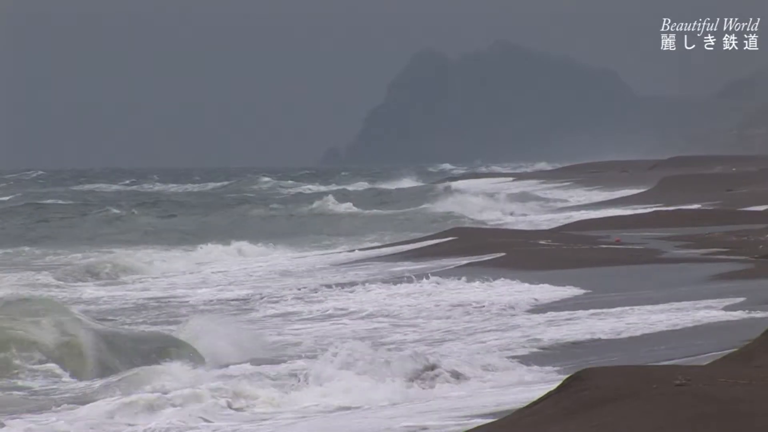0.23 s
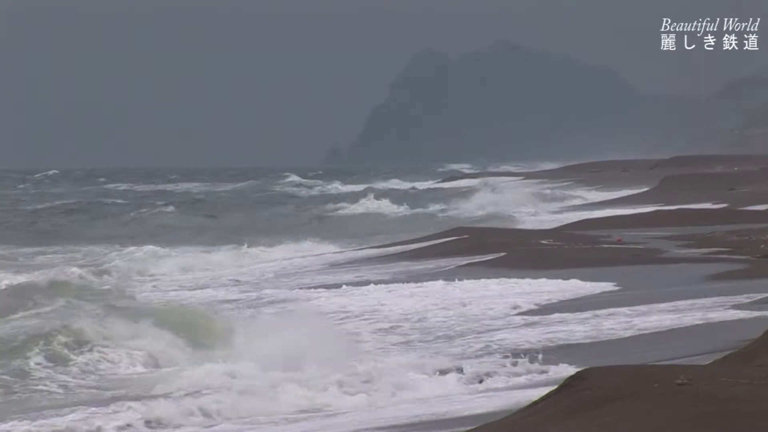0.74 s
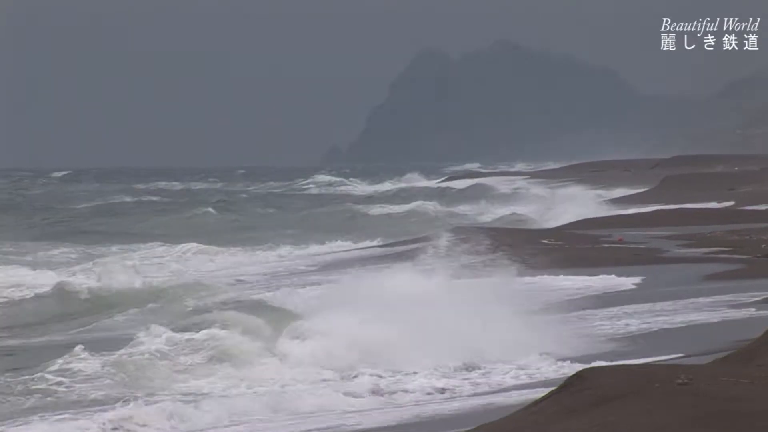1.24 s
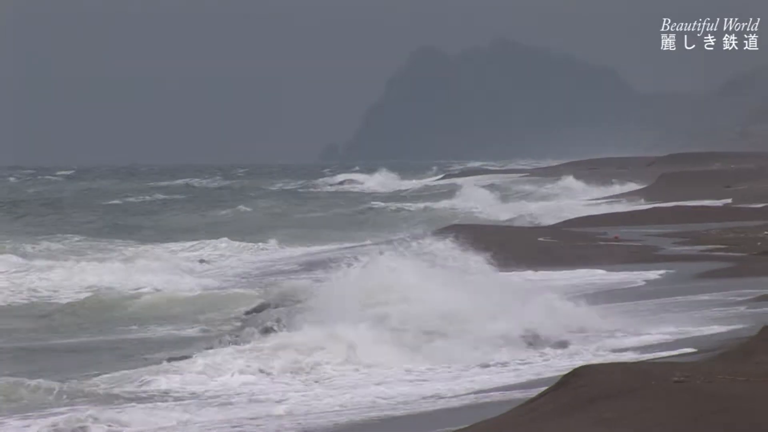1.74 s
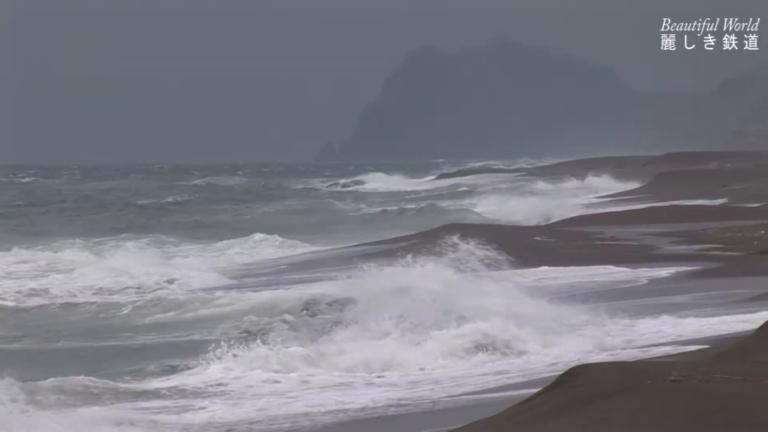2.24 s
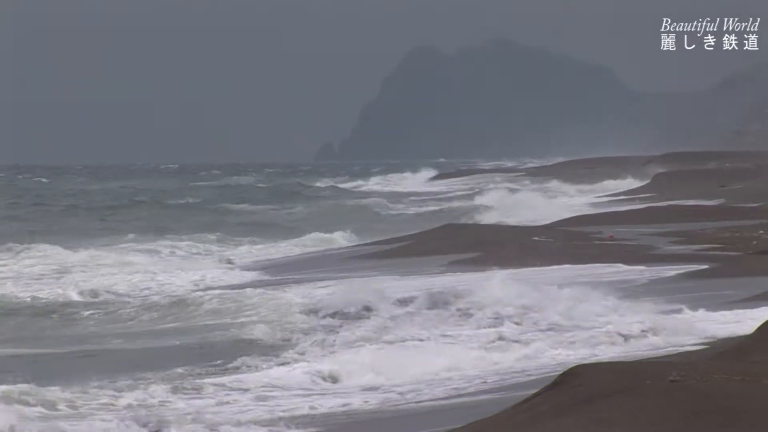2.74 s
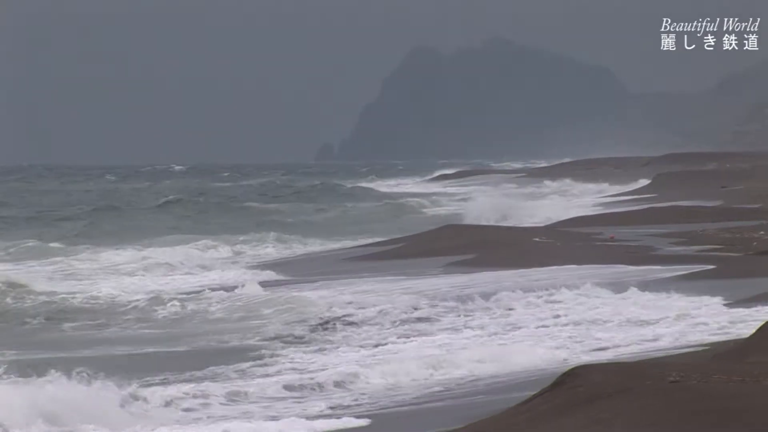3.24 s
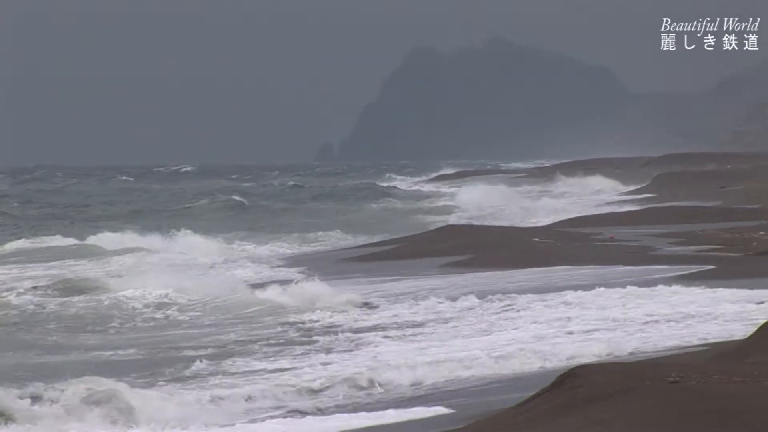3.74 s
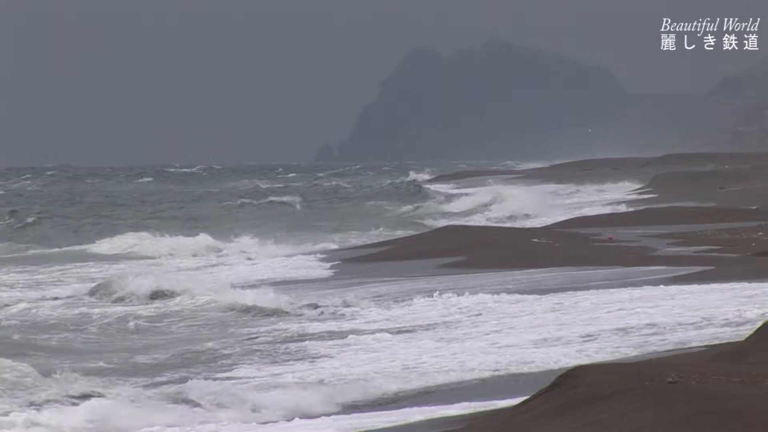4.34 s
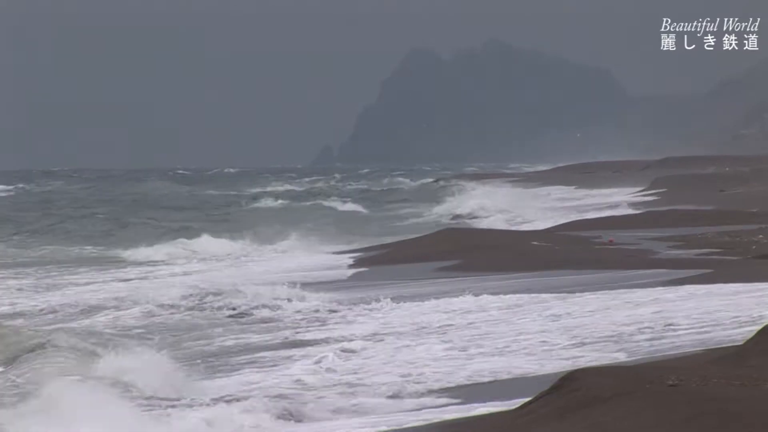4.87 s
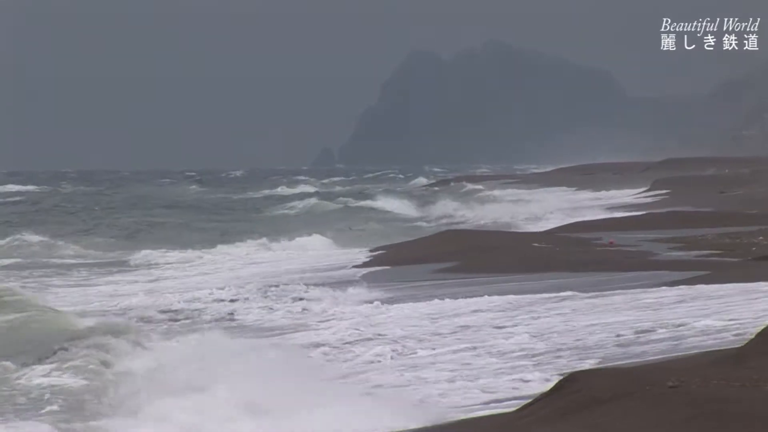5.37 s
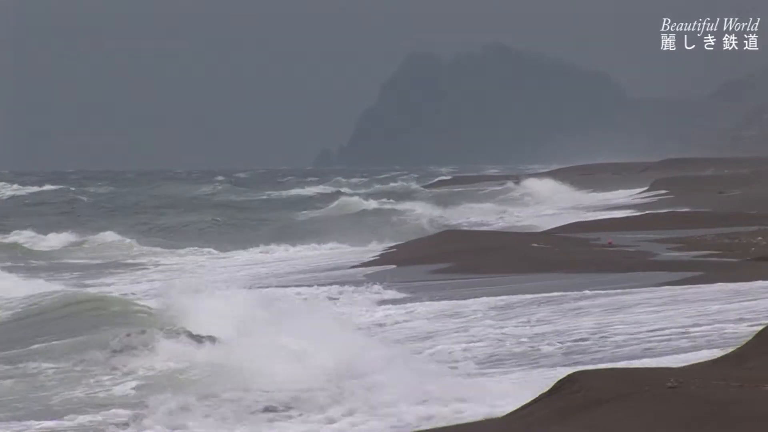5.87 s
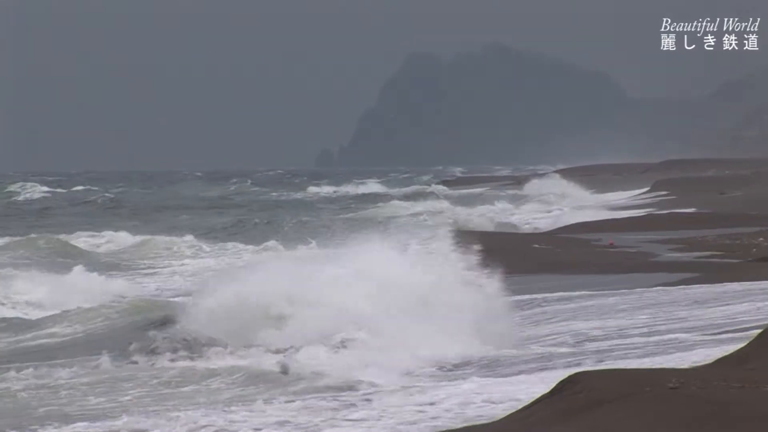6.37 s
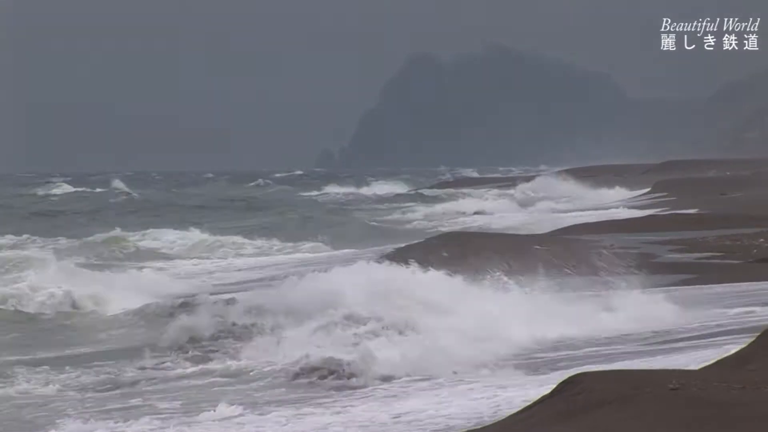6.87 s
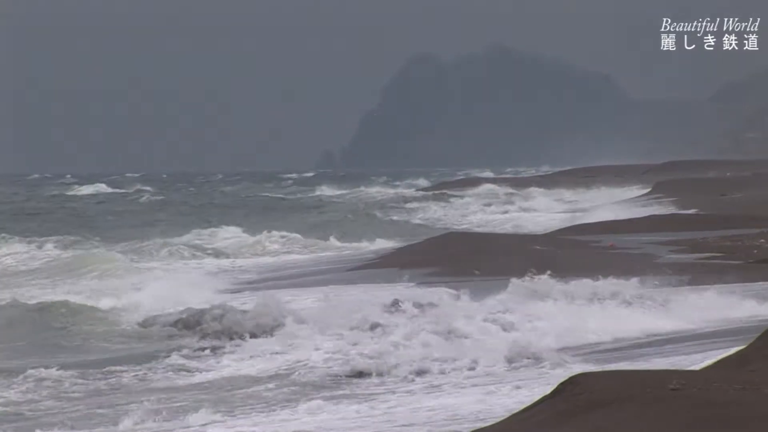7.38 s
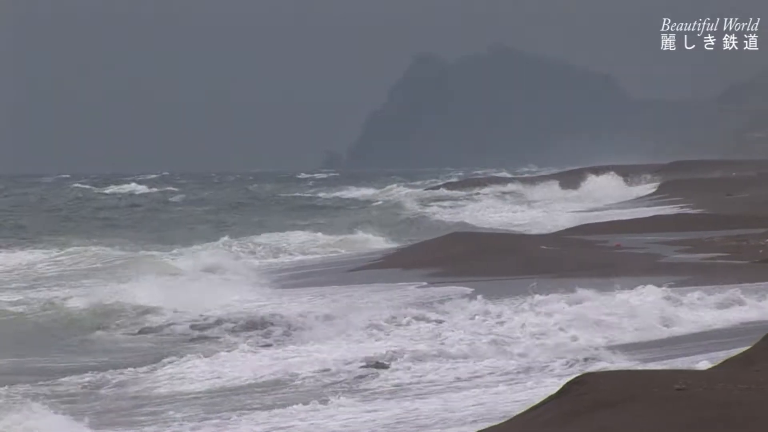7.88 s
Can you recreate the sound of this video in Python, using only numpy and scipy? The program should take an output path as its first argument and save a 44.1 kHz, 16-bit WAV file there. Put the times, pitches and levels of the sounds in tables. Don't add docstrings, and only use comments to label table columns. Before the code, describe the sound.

Wind rumble dominates at first, fluttering and knocking on two unshielded microphone ports, with rough sea roaring behind it. After three seconds the gusts break into separate short thumps and the surf sinks, then a new breaker builds from five seconds to a full roar with hissing foam and fizzing spray, easing at the end. Open beach, no echo.

```python
import sys
import numpy as np
from scipy import signal
from scipy.fft import rfft, irfft, next_fast_len
from scipy.io import wavfile
from scipy.ndimage import uniform_filter1d

SR = 44100
rng = np.random.default_rng(int(sys.argv[2]) if len(sys.argv) > 2 else 0)


def natural_amplitude(level_db):
    exponent = np.asarray(level_db, float) / 20
    return 10 ** exponent


def log_audio(samples):
    frames = np.atleast_2d(samples).T
    limited = np.clip(frames, -1, 1)
    pcm = np.round(limited * 32767).astype(np.int16)
    wavfile.write(sys.argv[1], SR, pcm)


N = 357642


def rms_one(x):
    return x / np.sqrt(np.mean(x ** 2) + 1e-20)


def in_time(rows):
    s, *columns = np.transpose(rows)
    return [np.interp(np.arange(N) / SR, s, c) for c in columns]


def at_hz(points, hz):
    points = np.array(points)
    return np.interp(np.log(hz + 1), np.log(points[:, 0] + 1), points[:, 1])


def swelling(start_s, length_s, rise_s, fall_s):
    end_s = start_s + length_s
    corners_s = [start_s - rise_s, start_s, end_s, end_s + fall_s]
    first = max(int(corners_s[0] * SR), 0)
    last = min(int(corners_s[-1] * SR), N)
    shape = np.zeros(N)
    shape[first:last] = np.interp(np.arange(first, last) / SR, corners_s, [0, 1, 1, 0])
    return shape


def drift(rate_hz):
    pole = np.exp(-80 * np.pi * rate_hz / SR)
    noise = rng.standard_normal(N // 40 + 2002)
    slow = signal.lfilter([1], [1, -2 * pole, pole * pole], noise)[2000:]
    return np.interp(np.arange(N) / 40, np.arange(len(slow)), rms_one(slow))


def steady(x, span_s):
    power = uniform_filter1d(np.mean(x ** 2, axis=0), max(int(span_s * SR), 1))
    return x * np.sqrt(power.mean() / (np.abs(power) + 1e-12))


def butter(x, order, hz, kind):
    return signal.sosfilt(signal.butter(order, hz, kind, fs=SR, output="sos"), x)


# freq_hz, share_0to1
LIKENESS = [(60, 0.88), (300, 0.96), (900, 0.83), (1900, 0.98), (2450, 0.49), (3000, 1), (4200, 0.63),
            (4650, 1), (5000, 1), (7200, 0.61), (9100, 0.89), (10400, 1), (12800, 0.3), (14000, .6)]
# freq_hz, lead_rad
LEFT_LEAD = [(0, 0), (250, .75), (600, 1.15), (1300, -.15), (2800, -.3), (3500, .3), (4400, 2.1),
             (4900, 1.2), (5500, 3.0), (9100, 3.3), (9600, 5.1), (12300, 6.4), (12900, 4.7), (15000, 7.4)]


def ports(sound, left, right):
    size = next_fast_len(N)
    hz = np.arange(size // 2 + 1) * SR / size
    common, own_left, own_right = rfft(sound, size)
    alike = np.clip(at_hz(LIKENESS, hz), 0, 1)
    shared, apart = np.sqrt(alike) * common, np.sqrt(1 - alike)
    lag = np.exp(-1j * np.interp(hz, *np.transpose(LEFT_LEAD)))
    at_left = (shared + apart * own_left) * natural_amplitude(at_hz(left, hz))
    at_right = (shared * lag + apart * own_right) * natural_amplitude(at_hz(right, hz))
    return rms_one(irfft([at_left, at_right], size)[:, :N])


# start_s, buffet_db, deep_rel_db, left_minus_right_db
BREEZE = [
    (0, -44, -6, 1),
    (1.2, -41, -23, 0),
    (2.9, -42, -14, 0),
    (3.1, -50, 4.5, 1.5),
    (4.1, -51, -4, 1.5),
    (5.6, -50, -0.5, 0),
    (6.2, -44, -6, 2.5),
    (7.3, -47, -11, 2),
    (8.11, -49, 3, -3),
]
# start_s, length_s, buffet_db, deep_rel_db, fine_rel_db
GUSTS = [(0.091, .05, -37, -4.5, -4), (0.17, .08, -35, -2, -2), (0.368, .06, -39, 4.5, -10),
         (0.466, .25, -31, -10, -11.5), (0.785, .08, -33, -16.5, -3.5), (0.901, .06, -32.5, -16, -6),
         (1.026, .13, -32, -11, -9), (1.23, .19, -36, -8, -5), (1.445, 0.11, -30.5, -20, -6.5),
         (1.595, .1, -30, -11, -6), (1.767, .14, -28.5, -19, -8), (1.94, .32, -34, -7, -5),
         (2.325, .4, -30.5, -16, -4.5), (2.752, .13, -28.5, -9.5, -8.5), (2.922, .07, -37.5, -5, -3.5),
         (3.25, .05, -35, -4, -4.5), (3.337, .08, -35, -7, -5), (3.849, .07, -38, -2, -4),
         (4.333, .065, -39, -3, -5), (4.522, .085, -31.5, -16.5, -4.5), (5.323, 0.09, -32, -12, -9),
         (5.9, 0.18, -40.5, -10, -4.5), (6.233, 0.07, -40, -2, -8), (7.48, .14, -35.5, -5, -4)]
# centre_s, buffet_db, deep_rel_db, fine_rel_db
PUFFS = [(7.44, -38.5, -4, -4), (1.73, -30.5, -2, 0), (3.215, -39.5, -5, -14), (3.55, -44, 1, -15),
         (3.68, -34.5, -6, -6), (3.76, -42.5, 0, -5), (3.931, -34.5, -7, -5.5), (4.03, -45.5, -12, -3),
         (4.48, -31, -16, -10), (4.66, -37.5, -7, -5), (4.74, -37, -13, -8), (4.89, -41.5, -8.5, -7),
         (4.989, -32.5, -4, -6), (5.1, -41.5, -2, -10.5), (5.16, -41.5, 4, -7), (5.509, -42, -15, 1),
         (6.15, -36, -6, -16), (6.34, -33.5, 0, -8), (6.379, -34, -2, -4), (6.51, -38.5, -12, -4),
         (6.6, -42, -11, -4), (6.71, -41.5, -1.5, -4), (6.84, -42, -9, -4), (6.94, -36.5, -1, -18),
         (7.0, -42, 0, -13), (7.13, -41.5, -10, 6), (7.88, -42, 4.5, -1), (7.97, -32.5, -5, -2),
         (8.055, -33.5, 7, -4), (8.084, -34, 9, 0)]


def airflow():
    puff_s, rise_s, fall_s = 0.02, 0.02, 0.025
    breeze_fine_db, breeze_wander_db, lean_wander_db = -4, 2.5, 2
    breeze_db, breeze_deep_db, lean_db = in_time(BREEZE)
    power = natural_amplitude(2 * (breeze_db + breeze_wander_db * drift(9)))
    deep, fine = power * breeze_deep_db, power * breeze_fine_db
    puffs = [(s - puff_s / 2, puff_s, *rest) for s, *rest in PUFFS]
    for start_s, length_s, buffet_db, deep_db, fine_db in list(GUSTS) + puffs:
        blast = natural_amplitude(2 * buffet_db) * swelling(start_s, length_s, rise_s, fall_s) ** 2
        power = power + blast
        deep = deep + blast * deep_db
        fine = fine + blast * fine_db
    return 10 * np.log10(power), deep / power, fine / power, lean_db + lean_wander_db * drift(7.4)


# freq_hz, level_db_per_hz
EDDY_LEFT = [(25, -7), (45, -1), (100, 1), (170, -0.5), (260, -3.5), (400, -12.5), (900, -14.5),
             (1800, -24.5), (2600, -25), (3400, -28), (5000, -50)]
EDDY_RIGHT = [(25, -22), (45, -4), (100, -1.5), (170, -1.5), (260, -4.5), (400, -10.5), (900, -28),
              (1800, -25), (2600, -26), (3400, -30), (5000, -60)]


def wind(eddies_per_s, denser, top, size_spread_db, flutter_db, fine_flutter_db, level_db):
    deep_below_hz, fine_above_hz = 86, 340
    buffet_db, deep_db, fine_db, pan_db = airflow()
    density_db = denser * (buffet_db - buffet_db.mean())
    born = rng.random((3, N)) < eddies_per_s * natural_amplitude(density_db) / SR
    born = born / natural_amplitude(density_db / 2)
    sizes = natural_amplitude(size_spread_db * np.minimum(rng.exponential(1, (3, N)), 4))
    eddies = born * rng.standard_normal((3, N)) * sizes
    eddies = ports(eddies * natural_amplitude(flutter_db * drift(28)), EDDY_LEFT, EDDY_RIGHT)
    deep, large = [signal.sosfiltfilt(signal.butter(2, hz, fs=SR, output="sos"), eddies)
                   for hz in (deep_below_hz, fine_above_hz)]
    middling = top * np.tanh(steady(large - deep, 0.081) / top)
    fine = (eddies - large) * natural_amplitude(fine_db - fine_db.mean() + fine_flutter_db * drift(30))
    deep = steady(deep, 0.164) * natural_amplitude(deep_db - deep_db.mean())
    lean = natural_amplitude((pan_db - pan_db.mean()) / 2 * np.array([[1], [-1]]))
    return (deep + middling + fine) * lean * natural_amplitude(buffet_db + level_db)


# start_s, vigour_db, brightness_db, break_weight_db
SURF = [(0, -45, 0, 0), (.62, -43.5, -1, -1.5), (1.24, -47.5, 0, -0.5), (1.8, -48, 0, 2.5),
        (2.06, -48, 5, 2), (2.3, -51, 3, 3), (2.38, -50, -2.5, 5.5), (2.85, -51, -3.5, -5.5),
        (3.02, -53, -1, -2), (3.9, -52.5, 0.5, -1.5), (4.4, -52, 0.5, -2.5), (5.0, -47.5, -0.5, -2),
        (5.3, -48.5, 1.5, -2), (5.45, -48.5, 0.5, 0.5), (6.57, -44, 1.5, 0.5), (7.3, -45.5, .5, -0.5),
        (7.75, -46.5, -1, -1), (8.11, -50, 1.5, 0)]
# centre_s, depth_db
LULLS = [(0.20, -5), (0.43, -4), (1.46, 0), (0.8, -2), (1.03, -2), (1.33, -3), (2.05, -2.5), (2.28, -4),
         (3.0, -2), (3.18, -6), (3.32, -3), (4.42, -6), (4.55, -5), (4.9, -2.5), (5.20, -5), (5.26, -4),
         (5.69, -6), (6.19, -4), (6.41, -5), (7.47, -4), (7.51, -7), (7.56, -8), (6.75, -2), (7.02, -3.5),
         (7.88, -7), (8.11, -5)]
# peak_s, over_surf_db
SLAPS = [(0.05, -3), (0.23, -0.5), (0.57, 7), (1.51, 4.5), (2.35, 2), (2.43, 3), (2.69, 5.5), (2.8, 7.5),
         (2.87, 3), (3.09, 1), (3.26, 3), (3.36, 10), (4.37, 2), (4.57, 8.5), (5.33, 3.5), (5.89, 3.5),
         (6.12, 3.5), (6.27, 5), (6.5, 8.5), (7.61, 9.5), (7.81, 1)]
LAYER_FOLLOWS = [0.82, 0.81, 0.94, 1.12]
LAYER_BRIGHTENS = [-.9, -.6, .05, .6]
LAYER_WEIGHS = [1.1, 0.21, .01, .01]


def surf_layers():
    lull_half_s, slap_rise_s, slap_fall_s = 0.039, 0.014, 0.032
    lull_reach = [0.35, 0.56, 0.71, 0.63]
    slap_reach = [0.97, 0.98, 0.16, 0.2]
    vigour_db, bright_db, weight_db = in_time(SURF)
    lulls_db = sum(db * swelling(s, 0, lull_half_s, lull_half_s) for s, db in LULLS)
    slaps_db = sum(db * swelling(s, 0, slap_rise_s, slap_fall_s) for s, db in SLAPS)
    shares = np.transpose([LAYER_FOLLOWS, LAYER_BRIGHTENS, LAYER_WEIGHS, lull_reach, slap_reach])
    return shares @ [vigour_db, bright_db, weight_db, lulls_db, slaps_db]


SURF_LAYER_HZ = [600, 1050, 4200, 11000]
# freq_hz, level_db_per_hz
LEFT_PORT = [(300, 0.5), (600, -1), (1800, 1), (2600, -6.5), (4700, -7), (5200, -11), (5650, -4),
             (6400, -17.5), (7150, -24), (7800, -19.5), (8600, -15.5), (9400, -18), (12700, -12),
             (15000, -20.5)]
RIGHT_PORT = [(300, 2), (900, -4.5), (1800, -6), (2450, -14), (3200, -8), (4650, -21), (5050, -10.5),
              (6400, -22.5), (7150, -37), (7700, -29), (9150, -24), (12600, -31), (14150, -28.5),
              (14400, -50)]


def surf(surge_db, patchy_db, pops_per_s, pop_spread_db, level_db):
    layers_db = surf_layers()
    swell_db = layers_db - layers_db.mean(axis=1, keepdims=True)
    pops = (rng.random((2, 3, N)) < pops_per_s / SR) * rng.standard_normal((2, 3, N))
    bursts = pops * natural_amplitude(pop_spread_db * np.minimum(rng.exponential(1, (2, 3, N)), 4))
    surge = drift(12)
    edges_hz = 30 * 2 ** np.arange(0, 9.6, 0.5)
    water = 0
    for k, (low_hz, high_hz) in enumerate(zip(edges_hz, edges_hz[1:])):
        band = butter(bursts[k % 2], 2, [low_hz, high_hz], "band")
        place = np.interp(np.log(low_hz * high_hz) / 2, np.log(SURF_LAYER_HZ), range(4))
        shares = np.clip(1 - abs(place - np.arange(4)), 0, 1)
        water = water + band * natural_amplitude(shares @ swell_db + surge_db * surge + patchy_db * drift(21))
    water = butter(water, 1, 92, "high")
    return natural_amplitude(level_db) * ports(water, LEFT_PORT, RIGHT_PORT)


def scene():
    air = wind(eddies_per_s=900, denser=0.8, top=1.7, size_spread_db=1.0, flutter_db=1.67,
               fine_flutter_db=1.0, level_db=0.07)
    water = surf(surge_db=0.79, patchy_db=0.46, pops_per_s=30000, pop_spread_db=1.2, level_db=-38.0)
    return water + air


def low_pass(x):
    return signal.sosfilt(signal.butter(12, 15110, fs=SR, output="sos"), x)


def record(dry):
    peak_top, rumble_cut_hz = 0.22, 38
    rounded = peak_top * np.tanh(dry / peak_top)
    mix = butter(rounded, 1, rumble_cut_hz, "high")
    return low_pass(mix)


dry = scene()
out = record(dry)
log_audio(out)
```